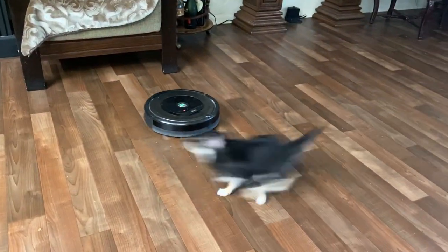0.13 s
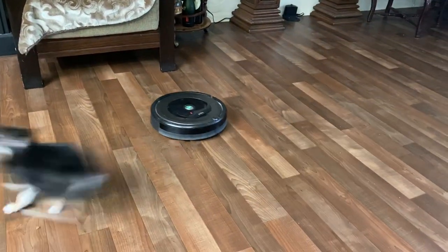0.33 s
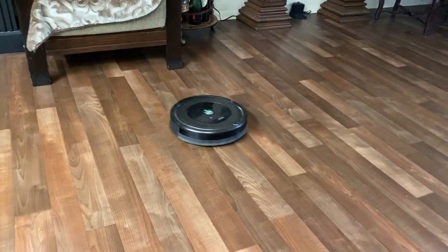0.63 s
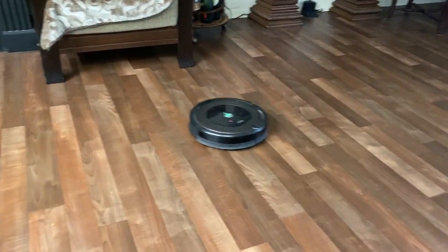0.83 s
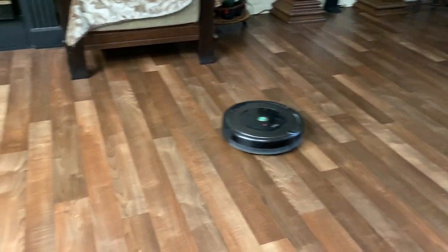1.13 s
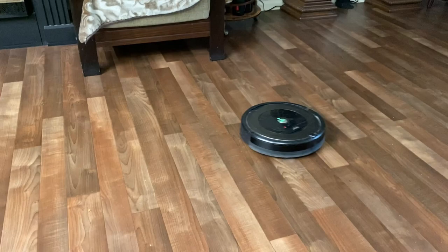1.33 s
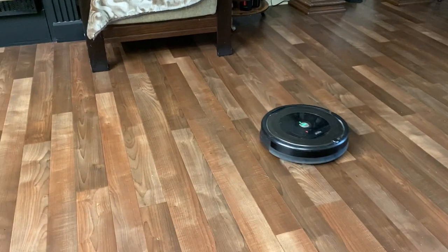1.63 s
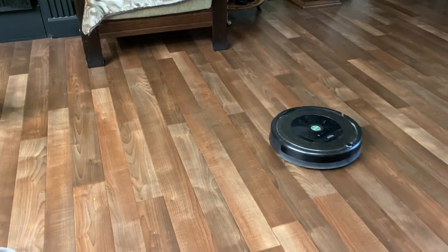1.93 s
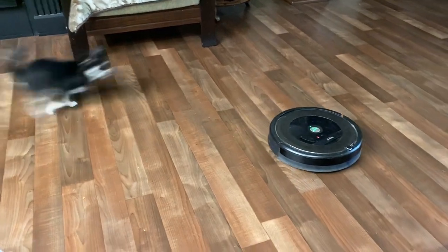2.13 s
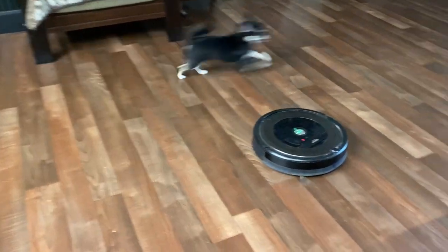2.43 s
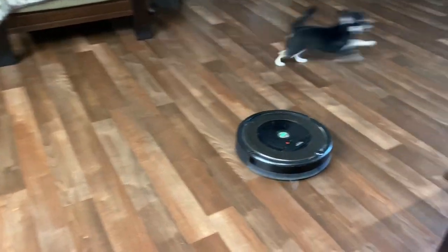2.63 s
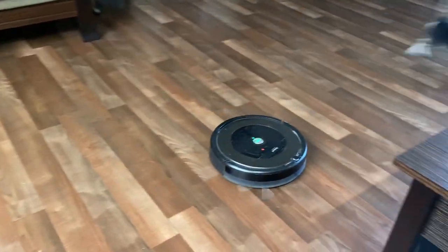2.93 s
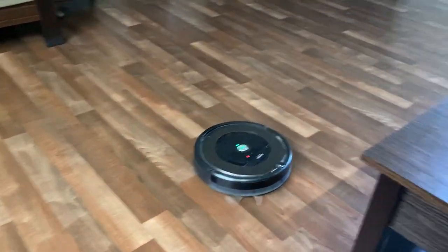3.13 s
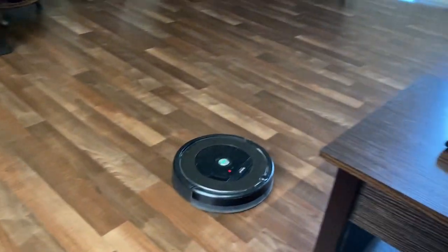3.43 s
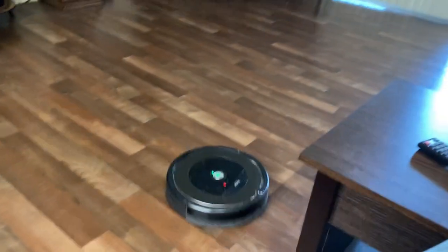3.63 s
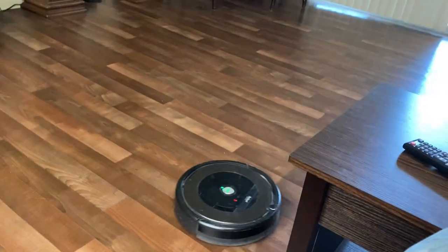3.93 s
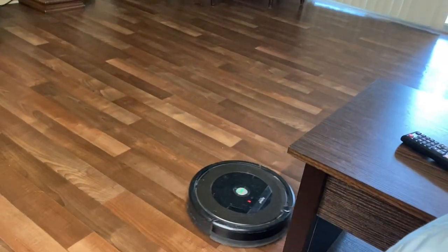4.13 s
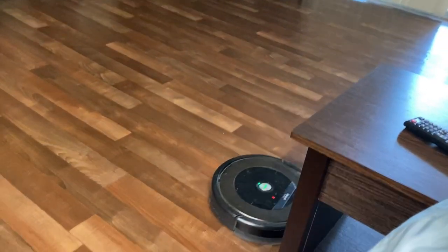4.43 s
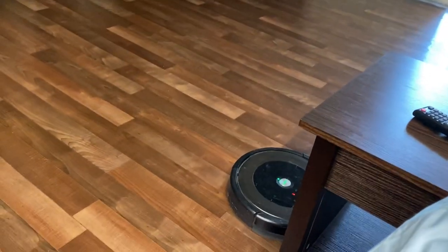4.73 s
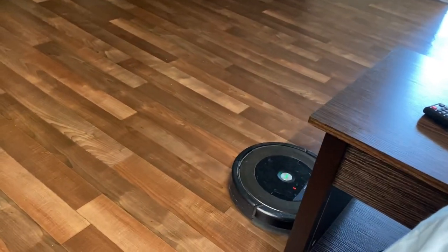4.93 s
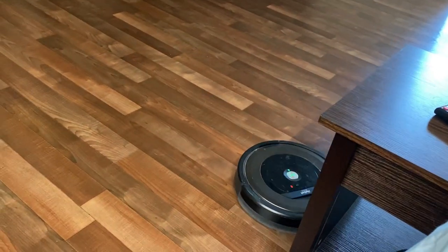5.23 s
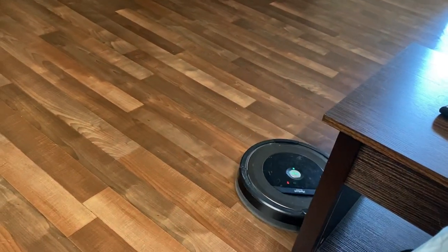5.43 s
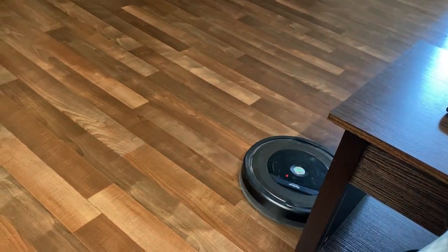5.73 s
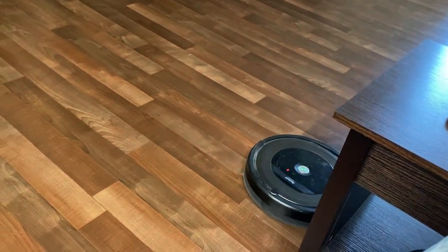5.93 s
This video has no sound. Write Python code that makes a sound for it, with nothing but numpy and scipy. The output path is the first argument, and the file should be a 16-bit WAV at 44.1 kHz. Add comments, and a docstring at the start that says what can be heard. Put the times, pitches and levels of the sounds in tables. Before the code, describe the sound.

A robot vacuum drones throughout in a living room, mixing low rumble, bristle rattle, airy hiss and a rough high gear whine. A puppy gallops past at once, paws thumping and claws ticking on laminate, then skids to a stop and scampers back. Later the vacuum lightly knocks a table leg, its gears racing briefly before it backs off. Handheld stereo microphone, a few steps away, short room reverberation.

```python
"""First a robot vacuum's rushing air and hum, heard in stereo in a living room with a laminate floor.
Filtered noise makes its rumble, drone, rattle and hiss; sines make the fan, roller, side brush and gears.
It bumps a table leg, its gears racing briefly, and backs off. A puppy gallops past twice: its paws ring the
board modes, its claws are noise cracks with short rings, and once it skids to a stop in resonant noise.
The room answers the blows with a decaying noise tail."""
import sys
import numpy as np
from scipy import signal
from scipy.fft import rfft, irfft, next_fast_len
from scipy.io import wavfile
from scipy.ndimage import uniform_filter1d, map_coordinates

SR = 44100
rng = np.random.default_rng(int(sys.argv[2]) if len(sys.argv) > 2 else 0)


def transcribe(signal):
    """Save signal, clipped to [-1, 1], as a 16-bit WAV file at the path in sys.argv[1]."""
    frames = np.atleast_2d(signal).T
    limited = np.clip(frames, -1, 1)
    pcm = np.round(limited * 32767).astype(np.int16)
    wavfile.write(sys.argv[1], SR, pcm)


def voltage_ratio(decibels):
    """Convert decibels (scalar or array-like) to amplitude ratios, 20 dB per decade."""
    exponent = np.asarray(decibels, float) / 20
    return 10 ** exponent


N = 268569  # samples


def unit(x):
    """Scaled to rms 1."""
    return x / np.sqrt(np.mean(x ** 2) + 1e-20)


def along(points, hz):
    """Reads (f/Hz, value) points at hz on a log frequency axis."""
    f, value = np.transpose(points)
    return np.interp(np.log(hz + 1), np.log(f + 1), value)


def curves(rows):
    """One value per sample for each column after the time."""
    s, *columns = np.transpose(rows)
    return [np.interp(np.arange(N) / SR, s, column) for column in columns]


def wobble(rate):
    """A smooth random curve, rate knots a second."""
    coarse = np.arange(0, N + 32, 32)
    knots = rng.standard_normal(int(N * rate / SR) + 5)
    return np.interp(np.arange(N), coarse, map_coordinates(knots, [coarse * rate / SR]))


def stroke(start_s, stop_s, rise, fall):
    """0 dB between start and stop, sloping off before and after by dB per second."""
    t = np.arange(N) / SR
    return -rise * np.maximum(start_s - t, 0) - fall * np.maximum(t - stop_s, 0)


def filtered(x, response):
    """x times a complex response of frequency."""
    m = next_fast_len(N + SR // 2)
    return irfft(rfft(x, m) * response(np.fft.rfftfreq(m, 1 / SR)), m)[..., :N]


def coloured(spectrum):
    """The gain of an (f/Hz, level/dB) table."""
    return lambda hz: voltage_ratio(along(spectrum, hz))


# how alike broad noise is at the left and right microphone: f/Hz, likeness (0 to 1)
LIKENESS = [(60, 1), (350, 0.92), (650, 0.12), (1100, 0.53), (1600, 0.12), (2200, 0.72), (3400, 1),
            (4400, 0.76), (5300, 0.33), (6300, 0.48), (7000, 1), (16000, 0.99)]


def rush(gain, patchy_db, wide=1):
    """Stereo noise of rms 1 with patches of random gain; wide > 1 makes the channels less alike."""
    z = signal.stft(rng.standard_normal((2, N)), nperseg=512)[2]
    field = rng.standard_normal(z.shape[1:])
    field = uniform_filter1d(uniform_filter1d(field, 6, 0), 14, 1)  # smooth over frequency, then time
    pair = signal.istft(z * voltage_ratio(patchy_db * unit(field)), nperseg=512)[1][:, :N]
    turn = lambda hz: np.arccos(np.clip(along(LIKENESS, hz), 0, 1) ** wide) / 2
    mid, side = filtered(pair, lambda hz: gain(hz) * [np.cos(turn(hz)), np.sin(turn(hz))])
    return unit(np.array([mid + side, mid - side]))


def tone(hz, db, waver_db, drift):
    """A sine of rms level db that wavers; wall echoes make its phase drift apart in the two channels."""
    phase = 2 * np.pi * (np.cumsum(hz) / SR + rng.random())
    apart = drift * wobble(1.944)
    return np.sqrt(2) * voltage_ratio(db + waver_db * wobble(14)) * np.sin([phase + apart, phase - apart])


def bump_shake_db():
    """The bump at the table leg shakes the shell: its rattle and drone rise by 3.5 dB, then sink back."""
    return 3.5 * voltage_ratio(stroke(4.655, 4.682, rise=640, fall=130))


# wheel rumble on the floor: t/s, level/dB
WHEEL_LEVEL = [(0, -44), (.4, -44), (1, -44), (2.4, -49.5), (3.5, -41.5), (4.2, -46.5), (4.8, -45),
               (6.09, -48.5)]
# wheel rumble spectrum: f/Hz, relative level/dB per Hz
WHEEL_SPECTRUM = [(15, -46), (30, -7), (55, 2), (80, 3.5), (110, -4), (150, -27), (250, -65)]
# low drone spectrum: f/Hz, relative level/dB per Hz
SHELL_SPECTRUM = [(70, -11), (120, -2.5), (200, 1.5), (260, 2.5), (330, -2), (400, -5), (460, -10),
                  (700, -31)]
# spans of the puppy's runs, with faint ticks; the low drone is a little louder or softer meanwhile:
# start t/s, end t/s, drone change/dB
RUNS = [(0, 0.903, 1.5), (1.402, 2.31, -2.5), (2.307, 3.15, 3)]


def wheels_and_shell():
    """Wheels rumble and the shell drones with low noise; both levels follow the same small jolts."""
    jolt = wobble(9)
    rumble = voltage_ratio(curves(WHEEL_LEVEL)[0] + 1.2 * jolt) * rush(coloured(WHEEL_SPECTRUM), patchy_db=1.2)
    drone_db = -40.5 + bump_shake_db()
    for start_s, end_s, change_db in RUNS:
        drone_db = drone_db + change_db * voltage_ratio(stroke(start_s, end_s, rise=69, fall=120))
    drone = voltage_ratio(drone_db + .5 * jolt) * rush(coloured(SHELL_SPECTRUM), patchy_db=1.2)
    return rumble + drone


# bristles and air, changing as the machine slips under the table: t/s, rattle level/dB, air level/dB
BRISTLES_AND_AIR = [(0, -41, -48.5), (1, -40.5, -46.5), (3, -38.5, -46), (3.6, -38, -48), (5.2, -41, -50),
                    (6.09, -38, -48.5)]
# bristle rattle spectrum: f/Hz, relative level/dB per Hz
RATTLE_SPECTRUM = [(300, -40), (450, -8.5), (700, -1.5), (1050, -1), (1400, -0.5), (1750, -1), (2100, -3),
                   (2650, -4.5), (3400, -2.5), (3900, -12), (5000, -25.5)]
# air hiss spectrum: f/Hz, relative level/dB per Hz
AIR_SPECTRUM = [(2500, -54), (3900, 2.5), (4800, -2.5), (5250, -0.5), (5700, -6), (6500, -6.5),
                (7500, -11.5), (10000, -13.5), (13000, -22), (15000, -27), (15700, -41), (16000, -60)]


def bristles_and_air():
    """Bristles rattle in mid-range noise and air rushes in as a treble hiss."""
    rattle_db, air_db = curves(BRISTLES_AND_AIR)
    rattle_db = rattle_db + bump_shake_db() + 0.96 * wobble(4.87)
    rattle = voltage_ratio(rattle_db) * rush(coloured(RATTLE_SPECTRUM), patchy_db=1.0)
    grit = voltage_ratio(.7 * wobble(20) + 1.5 * wobble(300))  # bristles flick grit: the hiss is slightly grainy
    return rattle + voltage_ratio(air_db) * unit(grit * rush(coloured(AIR_SPECTRUM), patchy_db=0.2))


# two hollow bands, louder while the exhaust side faces the microphone:
# t/s, 2.1 kHz band level/dB, 1.1 kHz band level/dB
EXHAUST_LEVELS = [(0, -46, -50), (.4, -47.5, -49), (.8, -44.5, -43), (1.3, -45.5, -48.5), (1.8, -51, -44),
                  (2.4, -50, -45), (3, -58, -47), (4.5, -52, -76), (5, -77, -68), (6.09, -72, -68)]


def exhaust():
    """Air in the vent sounds hollow: noise through two resonances."""
    def band(centre_hz, width_hz):
        return rush(lambda hz: 1 / (1 + ((hz - centre_hz) / width_hz) ** 2), patchy_db=-1.0)

    upper_db, lower_db = curves(EXHAUST_LEVELS)
    return voltage_ratio(upper_db) * band(2086, 87) + voltage_ratio(lower_db) * band(1097, 260)


# shaft speeds, fan a little higher once the drive stops at the bump: t/s, suction fan f/Hz, mean roller f/Hz
SHAFT_SPEEDS = [(0, 181.25, 170), (4.7, 181.25, 169), (4.85, 182.2, 169), (5.4, 181.8, 168.9),
                (6.09, 181.6, 168.8)]
# standing waves swell and fade the low tones as the fan crosses the room:
# t/s, 3rd order level/dB, 10th order level/dB
FAN_LOW_ORDERS = [(0, -55, -49.5), (.45, -61, -48.5), (.58, -62, -52), (.8, -75, -43), (1.3, -58, -70),
                  (1.7, -48, -47), (1.97, -46.5, -54), (2.2, -47.5, -48), (2.55, -51.5, -55),
                  (2.85, -60, -50), (3.3, -68, -47.5), (3.7, -57, -66), (4, -54.5, -53), (4.75, -83, -72),
                  (5.1, -82, -50), (5.35, -70, -53), (5.65, -62, -44.5), (5.88, -58, -60), (6.09, -55, -47)]
# weaker fan tones: shaft order, level/dB
FAN_WEAK_ORDERS = [(2, -55), (8, -63), (9, -63)]


def suction_fan():
    """Sines at whole multiples of the fan's shaft speed."""
    fan_hz = curves(SHAFT_SPEEDS)[0]
    low = sum(tone(k * fan_hz, db, waver_db=1.5, drift=.5) for k, db in zip((3, 10), curves(FAN_LOW_ORDERS)))
    # 20th order: echoes of the moving machine add and cancel quickly
    echoes = np.abs(1 + 1.2 * (wobble(7) + 1j * wobble(7)))
    blades = unit(echoes) * tone(20 * fan_hz, -54, waver_db=3.5, drift=0.85)
    weak = sum(tone(k * fan_hz, db, waver_db=4, drift=0.19) for k, db in FAN_WEAK_ORDERS)
    return low + blades + weak


# low tones: t/s, roller 1st order level/dB, 2nd order level/dB, wavering 80 Hz hum level/dB
ROLLER_LEVELS = [(0, -46.5, -45, -50), (.3, -43, -53, -39.5), (.9, -46.5, -44, -45.5), (1.4, -47, -55, -53),
                 (1.85, -52.5, -50.5, -44), (2.2, -49, -53.5, -52), (2.55, -52, -45.5, -56.5),
                 (3.05, -50.5, -48, -50), (3.4, -44.5, -46, -62), (3.95, -43.5, -47, -52),
                 (4.25, -46.5, -54, -51), (4.6, -46, -47, -55), (4.87, -47.5, -60, -47),
                 (5.2, -43, -42.5, -65), (5.5, -41.5, -43.5, -50), (6.09, -46.5, -43.5, -54)]


def roller_brush():
    """The first two shaft orders of the unsteady roller, over a hum wandering about 80 Hz."""
    first_db, second_db, hum_db = curves(ROLLER_LEVELS)
    roller_hz = curves(SHAFT_SPEEDS)[1] + .9 * wobble(12)
    first = tone(roller_hz, first_db, waver_db=1.5, drift=.2)
    second = tone(2 * roller_hz, second_db, waver_db=1.4, drift=.2)
    hum = tone(80 + 2.28 * wobble(7.4), hum_db, waver_db=0.0, drift=0.079)
    return first + second + hum


# side brush tones: shaft order, level/dB
SIDE_BRUSH_ORDERS = [(9, -59), (10, -58), (11, -60)]


def side_brush():
    """High shaft orders of the side brush, turning unsteadily about 117.4 times a second."""
    side_hz = 117.4 + 0.282 * wobble(3)
    return sum(tone(k * side_hz, db, waver_db=4.5, drift=0.25) for k, db in SIDE_BRUSH_ORDERS)


# gear mesh apart from the breaks, falling under load and louder as the machine draws near: t/s, f/Hz, level/dB
MESH_COURSE = [(0, 3470, -50), (.5, 3495, -48), (.7, 3440, -47), (1.05, 3430, -47), (1.3, 3495, -46),
               (1.78, 3495, -45), (1.98, 3355, -47), (2.4, 3470, -42), (2.65, 3380, -43),
               (2.95, 3390, -43.5), (3.2, 3420, -43), (3.38, 3395, -44), (3.55, 3460, -41),
               (4.2, 3378, -43), (4.65, 3420, -43), (5.1, 3405, -43), (5.6, 3405, -47), (6.09, 3415, -41)]
# the drive lets go, the gears race up quietly, then bite again and settle:
# release t/s, bite t/s, rise at release end f/Hz, rise at bite f/Hz, level dip/dB
BREAKS = [(4.69, 4.812, 270, 170, -9), (4.93, 4.995, 90, 130, -5), (5.22, 5.3, 0, 20, -10)]


def gear_drive():
    """Mesh pitch and level: the load curve and the breaks in the drive."""
    t, settle_s = np.arange(N) / SR, .055
    mesh_hz, mesh_db = curves(MESH_COURSE)
    for release_s, bite_s, race_hz, bite_hz, dip_db in BREAKS:
        free = np.clip((t - release_s) / (bite_s - release_s), 0, 1) * (t < bite_s)
        settling = (t >= bite_s) * np.exp(-np.abs(t - bite_s) / settle_s)
        mesh_hz = mesh_hz + race_hz * free ** 2 + bite_hz * settling
        mesh_db = mesh_db + dip_db * np.sin(np.pi * free)
    return mesh_hz, mesh_db


# gear whine, the 12th order being the mesh: shaft order, level relative to the mesh/dB
WHINE_ORDERS = [(2, -13), (10, -17), (11, -13), (12, 0)]


def wheel_gears():
    """Twelve teeth mesh in a rough whine with lower sidebands; load slows and roughens it."""
    teeth = 12
    mesh_hz, mesh_db = gear_drive()
    load = np.clip((3540 - mesh_hz) / 110, .4, 1.2)
    shaft_hz = (mesh_hz + 23 * load * wobble(130)) / teeth
    flutter_db = mesh_db + 2.2 * load * wobble(80)
    return sum(tone(k * shaft_hz, flutter_db + db, waver_db=.6, drift=.4) for k, db in WHINE_ORDERS)


# modes of the laminate boards: f/Hz, level/dB, t60/s
BOARD_MODES = [(58, 5, 0.1), (78, 3, 0.089), (129, 3.5, 0.091), (166.7, -5.5, 0.1), (216, -4.5, 0.21),
               (253.4, 3, 0.076), (324, -4, 0.11), (396, -7, 0.15), (522, -3.5, 0.09), (627, 5.5, 0.079),
               (780, -7, 0.053), (950, -3.5, 0.15), (1270, -2, 0.056), (1720, -8, 0.042), (2090, -11, .03)]
# puppy's paws landing on the boards: t/s, blow level/dB, centre f/Hz
PAW_BLOWS = [(.066, -19, 233), (0.132, -14, 208), (.187, -17.5, 240), (0.268, -17.5, 85), (.349, -27, 280),
             (.6, -31, 85), (0.631, -19, 313), (.648, -18.5, 197), (.799, -23, 195), (0.91, -24, 102),
             (2.752, -19, 85), (2.795, -19, 65), (2.838, -12, 144), (2.871, -16.5, 105), (2.905, -21, 72),
             (3.052, -18.5, 75), (3.068, -23, 200), (3.448, -24.5, 62.6), (3.55, -36, 70)]
# bumper meeting the table leg and springing back: t/s, blow level/dB, centre f/Hz
BUMPER_BLOWS = [(4.652, -30, 1200), (4.662, -26, 258), (4.68, -28, 400), (4.693, -23.5, 182),
                (4.829, -30.5, 258)]


def thuds():
    """Each blow rings the boards near its own pitch: a soft pad rings few modes, a hard bumper many."""
    out, t = np.zeros(N + SR), np.arange(SR // 4) / SR
    hz, level, t60 = np.transpose(BOARD_MODES)[:, :, None]
    # each blow gains a rise time (s) and a softness (dB lost per octave from its centre)
    blows = [(*row, .009, 13) for row in PAW_BLOWS] + [(*row, .004, 7) for row in BUMPER_BLOWS]
    lucks = rng.standard_normal((len(blows), 2, len(BOARD_MODES), 1))
    for (s, db, centre_hz, rise_s, soft_db), (level_luck, phase_luck) in zip(blows, lucks):
        near_db = -soft_db * np.abs(np.log2(hz / centre_hz))
        envelopes = voltage_ratio(level + near_db + 1.2 * level_luck - 60 * t / t60)
        ring = envelopes * np.sin(2 * np.pi * hz * t + 2 * phase_luck)
        onset = (1 - np.exp(-t / rise_s)) ** 2
        out[round(s * SR):][:len(t)] += voltage_ratio(db) * onset * ring.sum(0)
    return out[:N]


# claws dragging over the boards: t/s, peak level/dB, held/s
SCRAPE_TIMES = [(.08, -51, 0.016), (.158, -50, 0), (.8, -45, 0.0023), (0.857, -30, .07), (1.01, -38, 0),
                (1.1, -50, 0.025), (4.665, -56, 0), (5.7, -48.5, 0.0067), (5.84, -47, 0.042),
                (5.986, -42.5, 0.027)]
# scrape spectrum: f/Hz, relative level/dB per Hz
SCRAPE_SPECTRUM = [(1500, -42), (3000, -10.5), (4000, -4.5), (6300, 0), (7500, -6), (10000, -6.5),
                   (15300, -9.5), (16100, -50)]


def claw_scrapes():
    """Claws scrape in a dense grainy hiss: treble noise with a quickly flickering level."""
    level = sum(voltage_ratio(db + stroke(s, s + held, rise=346, fall=192)) for s, db, held in SCRAPE_TIMES)
    grain = voltage_ratio(1.2 * wobble(250) + .8 * wobble(30))
    return level * unit(grain * rush(coloured(SCRAPE_SPECTRUM), patchy_db=1.2))


def patter():
    """Faint ticks at random moments of each run, as (t/s, level/dB)."""
    rate_per_s, centre_db, spread_db = 14, -41, 4
    rows = []
    for start_s, end_s, _ in RUNS:
        gap, size = rng.random((2, 40))
        times = start_s - np.cumsum(np.log(gap)) / rate_per_s
        levels = centre_db + spread_db * 2 * (size - .5)
        rows += [(s, db) for s, db in zip(times, levels) if s < end_s]
    return rows


# claw ticks on the laminate: t/s, strike level/dB
CLAW_TICKS = [(0.1225, -47), (0.1515, -32), (0.2974, -27.5), (0.302, -30), (0.337, -27), (0.3494, -29),
              (0.508, -30), (0.5481, -23.5), (0.689, -28.5), (1.0044, -40), (1.39, -32.5), (1.4445, -27.5),
              (1.5864, -33), (1.6466, -33), (1.7895, -39), (1.8321, -37), (1.894, -33), (1.96, -32.5),
              (2.0711, -30), (2.1752, -31.5), (2.3145, -26.5), (2.4901, -32), (2.5211, -30),
              (2.5344, -27.5), (2.714, -24.5), (2.7535, -30), (2.9344, -33), (2.9507, -27), (2.9574, -25),
              (3.1122, -29), (3.9623, -30.5), (4.2389, -33), (4.6657, -31)]


def claws():
    """A bright crack, a scuffing tail and a short 3.5 kHz ring; smaller ticks follow each claw tip."""
    cracks, rings, t = np.zeros(N + SR), np.zeros(N + SR), np.arange(1500) / SR
    shape = voltage_ratio(-60 * t / .004) + .3 * voltage_ratio(-60 * t / .07)  # crack, then scuff
    ring = voltage_ratio(-22 - 60 * t / .006) * np.sin(2 * np.pi * 3500 * t)
    ticks = CLAW_TICKS + patter()
    noises = rng.standard_normal((len(ticks), len(t)))
    followers = rng.random((len(ticks), 3, 2))
    for (s, db), noise, small in zip(ticks, noises, followers):
        cracks[round(s * SR):][:len(t)] += voltage_ratio(db) * noise * shape
        for late, size in small:
            later_s = s + .002 + .05 * late ** 2
            cracks[round(later_s * SR):][:len(t)] += voltage_ratio(db - 11 - 8 * size) * noise[::-1] * shape
        rings[round(s * SR):][:len(t)] += voltage_ratio(db) * ring
    band = signal.butter(N=2, Wn=[4000, 13500], btype="band", fs=SR, output="sos")
    return (signal.sosfilt(band, cracks) + rings)[:N]


# resonances of the body's slide: centre f/Hz, width f/Hz, level/dB
SLIDE_MODES = [(766, 130, 3), (940, 75, 5.5), (1093, 57, 6), (1266, 70, 3), (1610, 520, -2)]


def body_slide():
    """A body slides over the boards: wide resonant noise fades from lower modes towards higher ones."""
    start_s, stop_s, climb_s = .64, .93, .17

    def ring(modes):
        def response(f):
            total = 0
            for k, (centre, width, db) in enumerate(modes):
                resonance = 1j * f * width / (centre * centre - f * f + 1j * f * width)
                total = total + (-1) ** k * voltage_ratio(db) * resonance
            return total
        return response

    since = np.arange(N) / SR - start_s
    slide_db = -31.5 - 20 * np.abs(since) + stroke(start_s, stop_s, rise=260, fall=230)
    climb = np.clip(since / climb_s, 0, .85)
    low = rush(ring(SLIDE_MODES[:3]), patchy_db=1.5, wide=2.5)
    high = rush(ring(SLIDE_MODES[1:]), patchy_db=1.5, wide=2.5)
    return voltage_ratio(slide_db + 1.84 * wobble(22.1)) * (np.sqrt(1 - climb) * low + np.sqrt(climb) * high)


# decay of the living room: f/Hz, t60/s
ROOM_DECAY = [(200, 0.17), (2000, 0.49), (10000, 0.14)]


def room(x):
    """Each frequency of the room's answer dies at its own speed, in a stereo noise tail."""
    hz, t, z = signal.stft(rng.standard_normal((2, SR // 2)), SR, nperseg=256)
    tail = signal.istft(z * voltage_ratio(-60 * t / along(ROOM_DECAY, hz)[:, None]), SR, nperseg=256)[1]
    delayed = np.pad(x, (300, 0))[None]  # samples
    return signal.fftconvolve(delayed, tail / np.linalg.norm(tail[0]), axes=1)[:, :N]


def scene():
    """Machine, puppy and the room's answer to the blows."""
    machine = wheels_and_shell() + bristles_and_air() + exhaust()
    motors = suction_fan() + roller_brush() + side_brush() + wheel_gears()
    blows = thuds() + claws()
    return machine + motors + claw_scrapes() + body_slide() + blows + voltage_ratio(-9) * room(blows)


# balance of the two channels: f/Hz, left over right level/dB
LEFT_OVER_RIGHT = [(60, -2.5), (120, 3), (240, -0.5), (480, -1), (950, 0), (1890, -0.5), (3770, 2),
                   (7520, 1.5), (15000, -1.5)]
# phase between the channels: f/Hz, right ahead of left/rad
RIGHT_AHEAD = [(50, 0.2), (450, 0.26), (700, -1), (2000, 0.014), (3000, -1.05), (4000, -0.3), (5500, 0.87),
               (6300, 0.12), (7000, -0.0087)]


def stereo_image(dry):
    """Unequal channels; in the treble the right runs by turns in step with the left, ahead or against it."""
    def lead(hz):
        ramp = 2 * np.pi * np.maximum(hz - 6950, 0) / 4200  # one turn every 4200 Hz above 6950 Hz
        return ramp - 0.033 * np.sin(2 * ramp) + along(RIGHT_AHEAD, hz)  # slightly stepped phase ramp

    def channels(hz):
        balance = voltage_ratio(np.outer([.5, -.5], along(LEFT_OVER_RIGHT, hz)))
        low_cut, top = hz ** 2 / (hz ** 2 + 30 ** 2), hz < 15900
        return balance * np.exp(.5j * np.outer([-1, 1], lead(hz))) * low_cut * top

    return filtered(dry, channels)


def low_pass(x):
    """Removes everything above the highest recorded frequency."""
    return signal.sosfilt(signal.butter(12, 16700, fs=SR, output="sos"), x)


def record(dry):
    """The scene with its stereo balance and phase, as the listener gets it."""
    mix = stereo_image(dry)
    return low_pass(mix)


dry = scene()
out = record(dry)
transcribe(out)
```